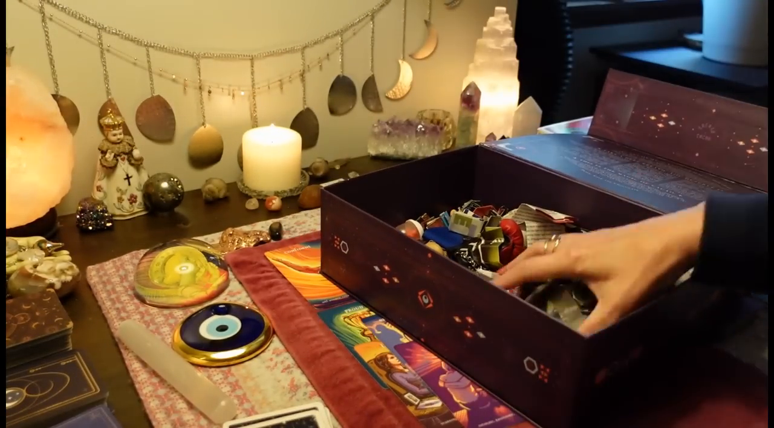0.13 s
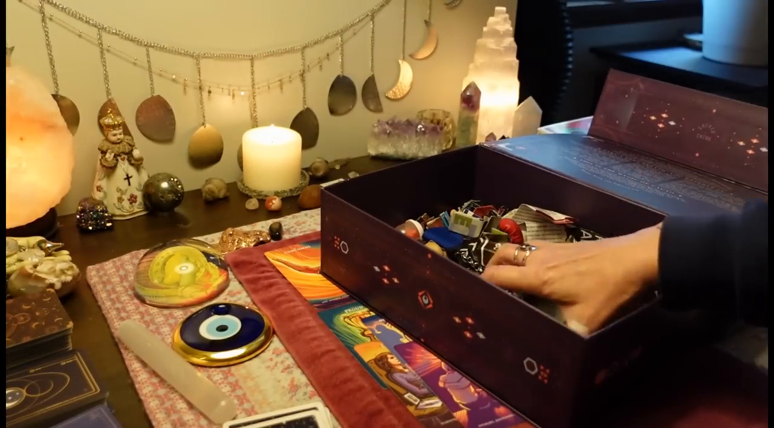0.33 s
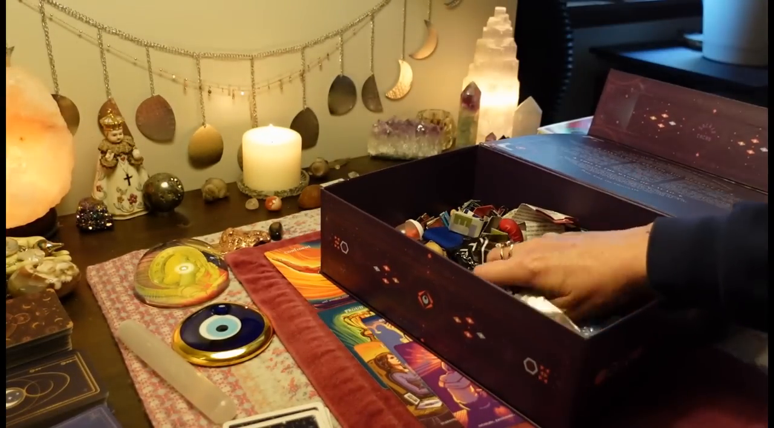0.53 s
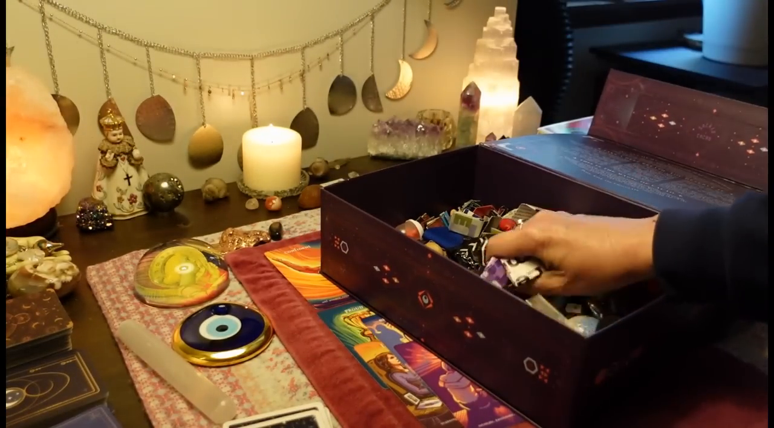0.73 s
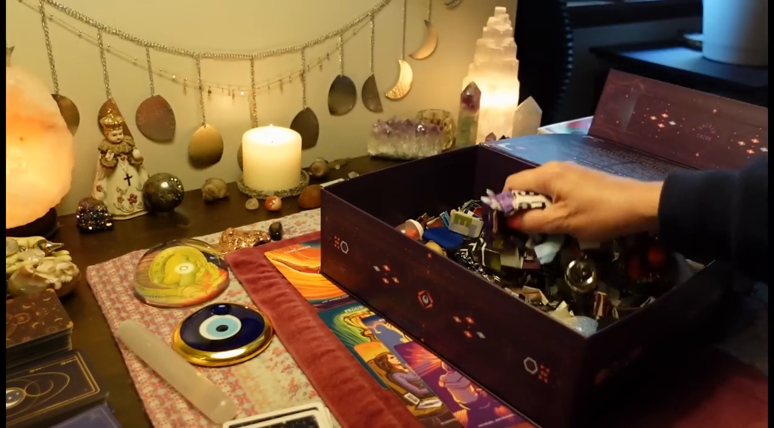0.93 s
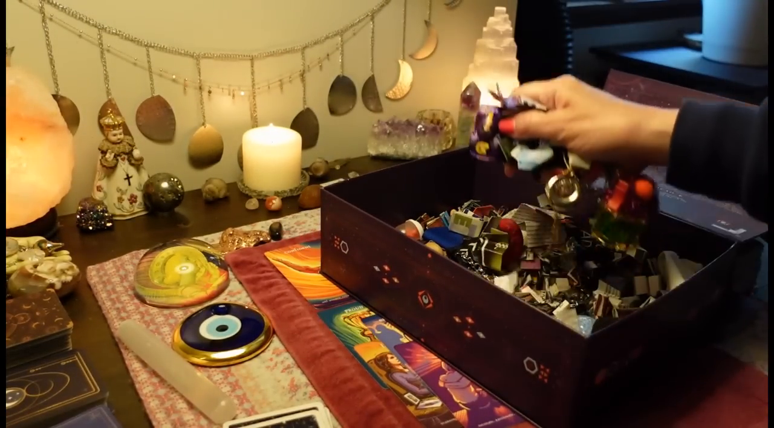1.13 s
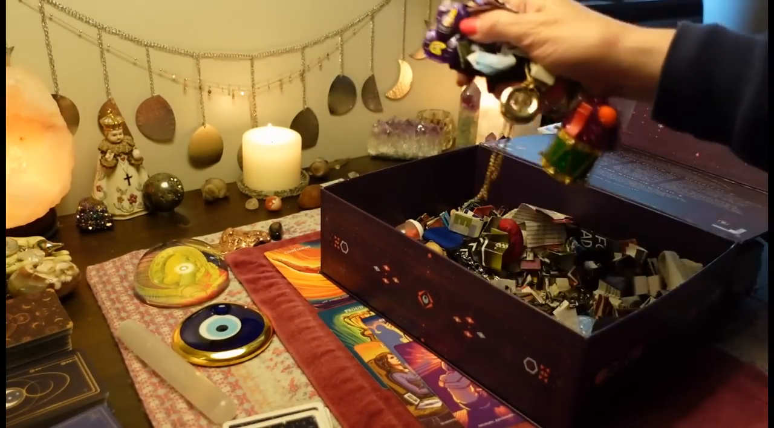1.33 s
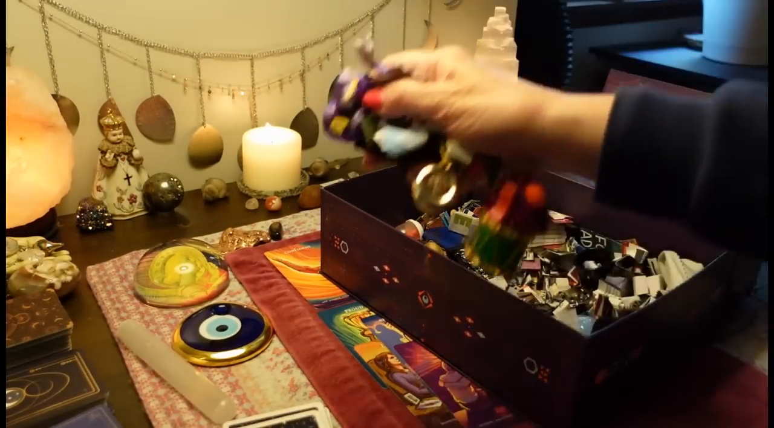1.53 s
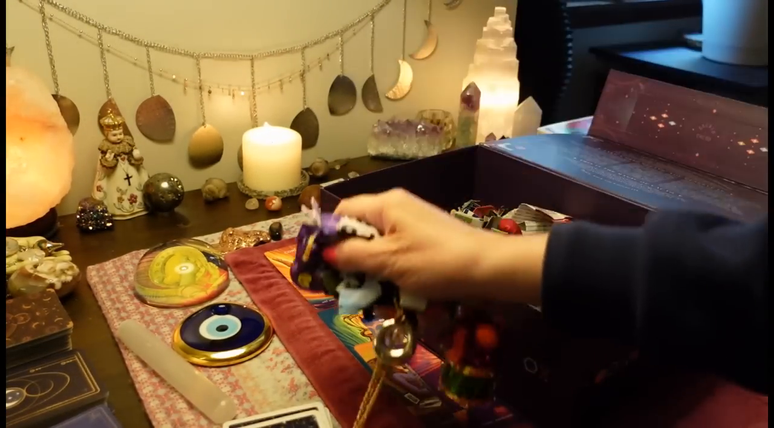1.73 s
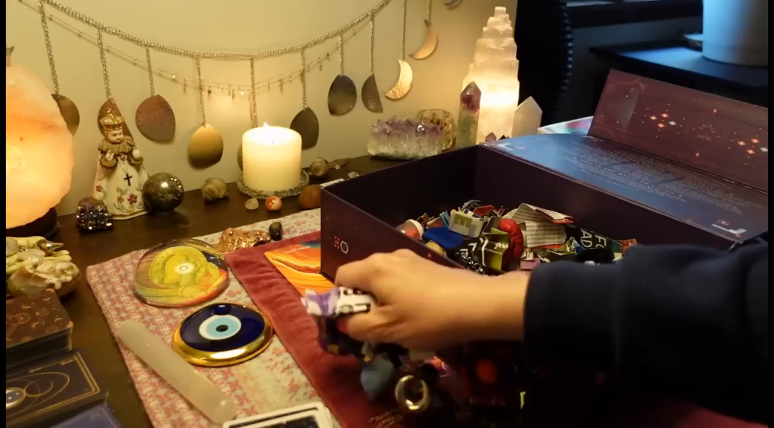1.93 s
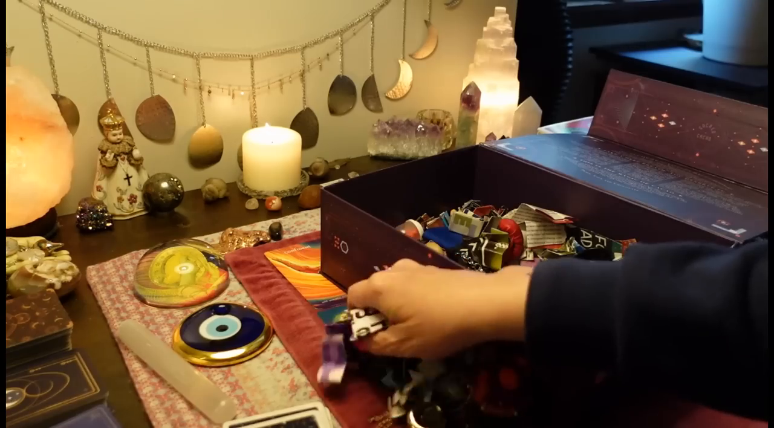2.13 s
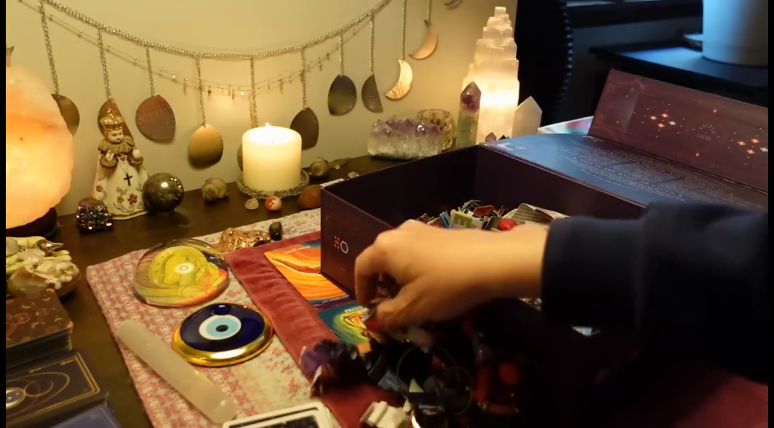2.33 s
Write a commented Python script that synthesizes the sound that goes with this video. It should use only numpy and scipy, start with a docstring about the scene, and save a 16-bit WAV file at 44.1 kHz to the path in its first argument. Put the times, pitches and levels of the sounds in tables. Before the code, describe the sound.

A hand digs through a box of little charms, lifts a handful and drops it with a clack

```python
"""A rustle of countless tiny contacts swells and falls, with dry ticks, small rings and low knocks, in a quiet room:
a hand digs into a cardboard box of small trinkets, lifts a handful and drops it on a table.
Random clicks excite decaying modes: those of many small pieces for the rustle, those of a thin wall for drumming
and knocks. Ticks are short bands of noise with rebounds; pings and a dangling charm are sums of dying modes.
Sparse decaying reflections make the room, and shaped noise its hush."""
import sys
import numpy as np
from scipy import signal
from scipy.fft import rfft, irfft
from scipy.io import wavfile
from scipy.ndimage import uniform_filter1d

SR = 44100
rng = np.random.default_rng(int(sys.argv[2]) if len(sys.argv) > 2 else 0)


def wrap_up_sound(samples):
    """Save the sound to the file named by the first command line argument, as 16-bit audio."""
    columns = np.atleast_2d(samples).T
    # keep every value between -1 and 1, then stretch to whole-number steps
    tamed = np.clip(columns, -1, 1)
    steps = np.round(tamed * 32767).astype(np.int16)
    wavfile.write(sys.argv[1], SR, steps)


def makeup_ratio(level_db):
    """Linear amplitude ratio for a level in decibels (20 dB per factor of ten)."""
    decades = np.asarray(level_db, float) / 20
    return 10 ** decades


N = 105310  # length in samples

# modes of a thin wall: mode_hz, relative_level_db, t60_s
WALL_MODES = [(541, -0.5, 0.036), (855, 0, 0.022), (1140, 2, 0.0092), (1486, -1, 0.011),
              (1865, -1.5, 0.012), (2250, 0.5, 0.0059), (2810, 0, 0.016), (4000, 10, 0.019)]
REBOUND_GAP_S = 0.0055  # longest gap between the rebounds of a tick


def evened(x):
    """Normalization by signal power: rms 1."""
    return x / np.sqrt(np.mean(x ** 2) + 1e-20)


def smooth(x, size):
    """Low-pass smoothing by two moving averages in cascade."""
    return uniform_filter1d(uniform_filter1d(x, size), size)


def steady(x, size=2205):
    """Envelope normalization: divides out the slow rms so that a control curve sets the level."""
    return x / np.sqrt(abs(smooth(x ** 2, size)) + 1e-12)


def read(points, hz):
    """Interpolation of a spectrum table along a logarithmic frequency axis."""
    table_hz, value = np.transpose(points)
    return np.interp(np.log(hz + 1), np.log(table_hz + 1), value)


def add(mix, start_s, sound):
    """Superposition: adds a sound to the mix from start_s on."""
    part = mix[round(start_s * SR):][:len(sound)]
    part += sound[:len(part)]


def ring(hz, t60, size=4000):
    """Free vibration of one damped mode: a sine that falls by 60 dB in t60 seconds."""
    t = np.arange(size) / SR
    decay = makeup_ratio(-60 * t / max(t60, .002))
    return decay * np.sin(2 * np.pi * min(hz, SR * .45) * t)


def contacts(per_s):
    """Shot noise: impulses at random times and of random sign, a few large, with loudness in clumps."""
    spread_db, clump_db, clump_s = 2, 2, 0.0044
    clump = evened(smooth(rng.standard_normal(N), 1 + int(clump_s * SR)))
    excess = np.minimum(rng.exponential(1, N), 5)
    size = makeup_ratio(spread_db * excess + clump_db * clump)
    sign = np.sign(rng.standard_normal(N))
    return size * sign * (rng.random(N) < per_s / SR)


def stir(index):
    """Amplitude modulation: the gain over time that the stirring hand gives to one layer."""
    # stirring of the heap: time_s, rustle_level_db, drumming_level_db
    stirring = np.array([(0, -66.5, -72), (0.147, -65, -64.5), (0.176, -40, -43.5), (0.221, -45.5, -53),
                         (0.254, -36, -35.5), (0.297, -32, -43.5), (0.364, -40, -44), (.4, -36, -39.5),
                         (0.457, -28, -31), (.52, -36.5, -39.5), (.65, -40, -49), (0.721, -48, -43.5),
                         (.82, -47, -54), (.94, -53.5, -65.5), (1.03, -47, -74), (1.1, -56, -69),
                         (1.2, -67, -83), (1.35, -63.5, -84), (1.5, -72.5, -95), (1.92, -66.5, -95),
                         (1.949, -53.5, -59.5), (2.035, -46, -53.5), (2.085, -47.5, -56.5),
                         (2.119, -34.5, -60), (2.188, -46.5, -43.5), (2.23, -48.5, -67),
                         (2.328, -48.5, -59.5), (2.39, -34.5, -61)])
    return makeup_ratio(np.interp(np.arange(N) / SR, stirring[:, 0], stirring[:, index]))


def air():
    """Stationary filtered noise: the hush of room and microphone, partly correlated left and right."""
    # spectrum of the hush: frequency_hz, relative_density_db
    hush = [(30, -2), (254, 10), (358, 8), (834, 7), (1180, 1.5), (9000, -14.5), (15300, -10.5),
            (16400, -31)]
    level_db, likeness = -61, 0.35
    frames, hz = N // 256 + 5, np.fft.rfftfreq(1024, 1 / SR)
    a, b, c, d = rng.standard_normal((frames, 513, 4)).T
    left, other = a + 1j * b, c + 1j * d
    right = likeness * left + np.sqrt(1 - likeness ** 2) * other
    spectrum = np.array([left, right]) * makeup_ratio(read(hush, hz))[:, None]
    noise = signal.istft(spectrum, nperseg=1024, noverlap=768)[1][:, :N]
    return makeup_ratio(level_db) * evened(noise)


def room(x):
    """Reverberation: sparse reflections decay exponentially, each band at its own rate, partly alike in both ears."""
    # decay of the room: frequency_hz, t60_s
    decay = ((200, 0.13), (12000, 0.26))
    likeness = 0.91
    taps = np.zeros((2, SR // 2))
    at = np.arange(60, SR // 2 - 20, 20)
    at = at + rng.integers(0, 20, (2, len(at)))  # one reflection in every 20 samples
    np.put_along_axis(taps, at, rng.choice([-1., 1.], at.shape), 1)
    hz, t, bands = signal.stft(taps, SR, nperseg=256)
    bands = bands * makeup_ratio(-60 * t / read(decay, hz)[:, None])
    common, side = signal.istft(bands, SR, nperseg=256)[1]
    tail = likeness * common + np.sqrt(1 - likeness ** 2) * side * np.array([[1], [-1]])
    return signal.fftconvolve(x[None], tail / np.linalg.norm(tail[0]), axes=1)[:, :N]


def board(centre_hz, drift):
    """Modal excitation of a thin wall: a blow wakes the modes near its centre; a small wall radiates little bass."""
    chance_db, blow_octaves, rise_cycles, low_hz = 1, 0.57, 0.22, 380
    modes = 0
    for hz, db, t60 in WALL_MODES:
        level_chance, pitch_chance = rng.standard_normal(2)
        excitation = np.exp(-.5 * (np.log2(hz / centre_hz) / blow_octaves) ** 2)
        level = makeup_ratio(db + chance_db * level_chance) * excitation
        modes = modes + level * ring(hz * (1 + drift * pitch_chance), t60)
    modes = modes * (1 - np.exp(-np.arange(len(modes)) / SR * centre_hz / rise_cycles))  # gradual onset
    return signal.sosfilt(signal.butter(4, low_hz, "highpass", fs=SR, output="sos"), modes)


def drumming():
    """Random excitation of resonators: the shifting heap drums on differently tuned wall spots; the box rumbles."""
    # slow bending of the box: mode_hz, relative_level_db, t60_s
    bending = [(159, 0, 0.051), (281, 0, 0.062), (385, 9.5, 0.041)]
    scrapes_per_s, drum_hz, spot_drift, rumble_db = 420, 600, .1, -3
    hits = contacts(scrapes_per_s)
    spot = np.repeat(rng.integers(0, 8, N // 600 + 1), 600)[:N]  # a spot drawn every 600 samples
    wall = np.zeros(N)
    for k in range(8):
        soft_hits = uniform_filter1d(hits * (spot == k), size=24)
        wall += signal.oaconvolve(soft_hits, board(drum_hz, spot_drift))[:N]
    box = sum(makeup_ratio(db) * ring(hz, t60) for hz, db, t60 in bending)
    rumble = signal.oaconvolve(uniform_filter1d(hits, size=60), box)[:N]
    return stir(index=2) * (steady(wall) + makeup_ratio(rumble_db) * steady(rumble, size=4410))


def knock(start_s, level_db, centre_hz):
    """Impact on a thin wall: one piece lands, and its hardness sets which modes sound, a thud or a clack."""
    return start_s, makeup_ratio(level_db) * board(centre_hz, drift=.015)


def jingle(start_s, level_db):
    """Modal superposition: a blow and a few rebounds ring all modes of one dangling charm."""
    # modes of the charm: mode_hz, relative_level_db, t60_s
    charm = [(7780, -6.5, 0.015), (8350, -3, 0.022), (7960, -17, 0.08), (9400, -2.5, 0.0035),
             (13500, -5.5, 0.0053)]
    when, size = rng.random((2, 5))
    delay_s = REBOUND_GAP_S / 2 * (np.cumsum(when) - when[0])
    blows = np.zeros(1000)
    blows[(delay_s * SR).astype(int)] = size - 1.5
    modes = sum(makeup_ratio(db) * ring(hz, t60, size=6000) for hz, db, t60 in charm)
    return start_s, makeup_ratio(level_db) * np.convolve(blows, modes)


def ping(start_s, level_db, ring_hz):
    """Free vibration of a small metal piece: one mode, a close partner and the click of the blow."""
    partner_ratio, partner_db, click_db = 1.12, -9, 4.5
    t60 = 0.028 * np.sqrt(WALL_MODES[-1][0] / ring_hz)  # high rings die sooner
    main = ring(ring_hz, t60)
    partner = makeup_ratio(partner_db) * ring(partner_ratio * ring_hz, t60)
    click = makeup_ratio(click_db) * ring(ring_hz, t60 / 10)
    return start_s, makeup_ratio(level_db) * (main + partner + click)


def tick(start_s, level_db, centre_hz):
    """Repeated impact: a dry crack and three quick, weaker rebounds, its noise band set by the size of the piece."""
    t60_s, octaves, low_hz, rebound_db = 0.013, 0.9, 810, -9
    noise, chance = rng.standard_normal((4, 1024)), rng.random((2, 4))
    hz, t = np.fft.rfftfreq(1024, 1 / SR) + 1, np.arange(1024) / SR
    band = np.exp(-.5 * (np.log2(hz / centre_hz) / octaves) ** 2 - (low_hz / hz) ** 2)
    noise = irfft(rfft(noise) * band)
    delay, loss = (np.cumsum(chance, axis=1) - chance[:, :1])[..., None]  # the first crack has neither
    since_s = t - REBOUND_GAP_S * delay
    decay_db = rebound_db * loss - 60 * since_s / t60_s
    onset = np.clip(since_s / 0.00013, 0, 1)
    cracks = evened(noise) * makeup_ratio(np.minimum(decay_db, 0)) * onset
    return start_s, makeup_ratio(level_db - 5) * cracks.sum(0)


def rustle():
    """Granular superposition: each tiny contact briefly rings some of many small pieces; now and then one clinks."""
    # spectrum of the rustle: frequency_hz, relative_density_db
    spectrum = [(530, -20), (900, 4.5), (2300, 2), (3310, 2), (8430, -0.5), (15100, -8), (16400, -26)]
    contacts_per_s, grain_cycles = 7700, 12
    clinks_per_s, clink_t60_s, clink_db = 400, .018, 12
    colour_db, colour_s = 3.5, .03
    hits, clinks, out = contacts(contacts_per_s), contacts(clinks_per_s), np.zeros(N)
    pitches = np.geomspace(900, 16000, num=40) * rng.uniform(1.0, 1.03, 40)
    piece = rng.integers(0, 40, N) + rng.integers(-3, 4, (3, N))  # up to three neighbours a contact
    # other pieces come to the top: levels wander slowly, alike for neighbours
    colour = rng.standard_normal((40, N // 64 + 1))
    colour = uniform_filter1d(colour, int(colour_s * SR / 64), axis=1)
    colour = uniform_filter1d(colour, size=6, axis=0)
    colour = np.repeat(makeup_ratio(colour_db * evened(colour)), 64, axis=1)[:, :N]
    for k, hz in enumerate(pitches):
        grain = ring(hz, grain_cycles / hz, size=800)
        grain *= makeup_ratio(read(spectrum, hz)) * np.sqrt(hz) / np.linalg.norm(grain)  # bands widen with pitch
        clink = ring(hz, clink_t60_s, size=2000)
        clink *= makeup_ratio(clink_db) * np.linalg.norm(grain) / np.linalg.norm(clink)
        out += signal.oaconvolve(clinks * (piece[0] == k), clink)[:N]
        out += signal.oaconvolve(hits * colour[k] * (piece == k).sum(0), grain)[:N]
    return stir(index=1) * steady(out)


def scene():
    """Superposition of direct sound, reverberation and hush: heap and single pieces, their room, its air."""
    # pieces clattering against each other: start_s, level_db, centre_hz
    clatter = [(0.2465, -19.5, 8900), (0.2545, -19, 7960), (0.2792, -16, 4430), (0.4499, -28, 3060),
               (0.5881, -20.5, 5350), (0.6304, -40, 8570), (0.6465, -20.5, 4760), (0.6835, -23.5, 3460),
               (0.7816, -24, 6000), (0.846, -26.5, 5500), (1.3887, -43, 1870), (1.7744, -29.5, 7400),
               (1.9295, -35.5, 2480), (1.9545, -35.5, 8540), (1.9689, -29, 2530), (2.0153, -28, 3400),
               (2.031, -23, 3720), (2.0527, -25, 4150), (2.0981, -18.5, 3420), (2.1124, -21.5, 4000),
               (2.1415, -20, 4040), (2.1685, -19, 4360), (2.2478, -30, 2250), (2.3375, -21, 1940)]
    # pieces that ring when struck: start_s, level_db, ring_hz
    struck = [(.287, -36, 8000), (.303, -28, 9200), (.3885, -25.5, 2300), (.4035, -26, 2276),
              (.4174, -26, 2450), (.6145, -30, 8540), (.846, -36, 14800), (.876, -41.5, 2250),
              (.996, -48, 2320), (1.0045, -42, 14300)]
    # blows to the dangling charm: start_s, level_db
    charm_blows = [(1.045, -36), (1.058, -35.5), (1.067, -36.5), (1.0715, -39), (1.1223, -52)]
    # pieces landing on box floor or table: start_s, level_db, centre_hz (soft pieces low, hard ones high)
    landings = [(.179, -29.5, 550), (.277, -22.5, 850), (.324, -21, 540), (.481, -24.5, 600),
                (.552, -21.5, 1320), (.718, -32, 515), (1.9295, -28.5, 600), (1.978, -20.5, 526),
                (2.098, -24, 1210), (2.123, -19, 494), (2.3375, -18.5, 1030), (2.3615, -25, 1240),
                (2.3654, -6.5, 1640), (2.3665, -8, 600), (2.3682, -16, 1530)]
    left_db, room_db = 0.45, -6.5
    near = rustle() + drumming()
    for rows, source in ((clatter, tick), (struck, ping), (charm_blows, jingle), (landings, knock)):
        for row in rows:
            add(near, *source(*row))
    direct = near * makeup_ratio(np.array([[left_db], [-left_db]]))
    return direct + makeup_ratio(room_db) * room(near) + air()


def roll_off(x):
    """The treble ends steeply here."""
    return signal.sosfilt(signal.butter(12, 16600, fs=SR, output="sos"), x)


def record(dry):
    """Band limitation: a small microphone takes little bass and nothing far above its top frequency."""
    low_hz, top_hz = 118.5, 16000
    thin = signal.sosfilt(signal.butter(4, low_hz, "highpass", fs=SR, output="sos"), dry)
    top_filter = signal.firwin(255, top_hz, window=("kaiser", 8), fs=SR)
    finished = signal.oaconvolve(thin, top_filter[None], "same")
    return roll_off(finished)


dry = scene()
out = record(dry)
wrap_up_sound(out)
```